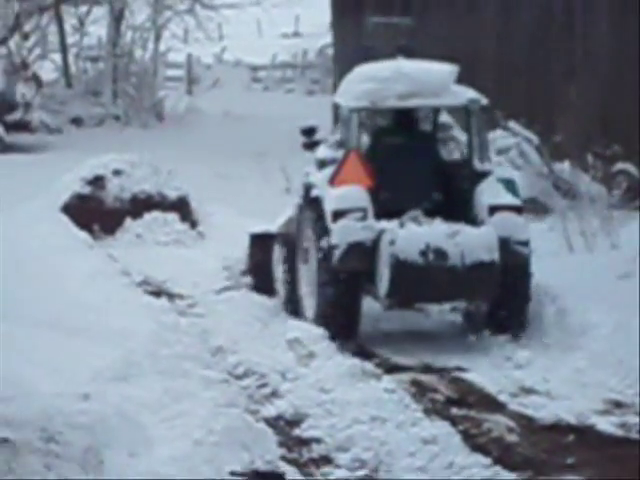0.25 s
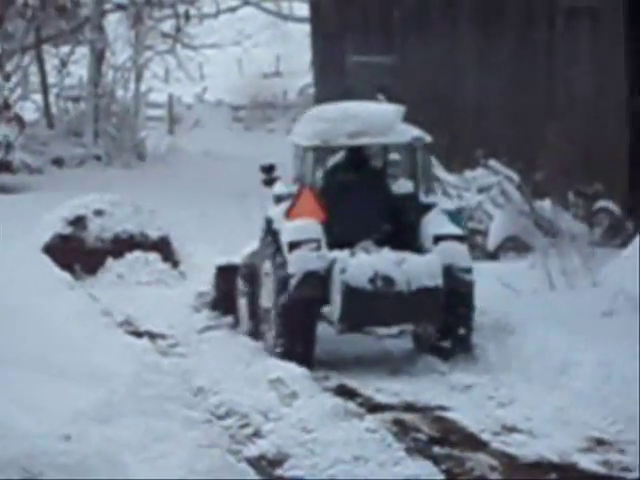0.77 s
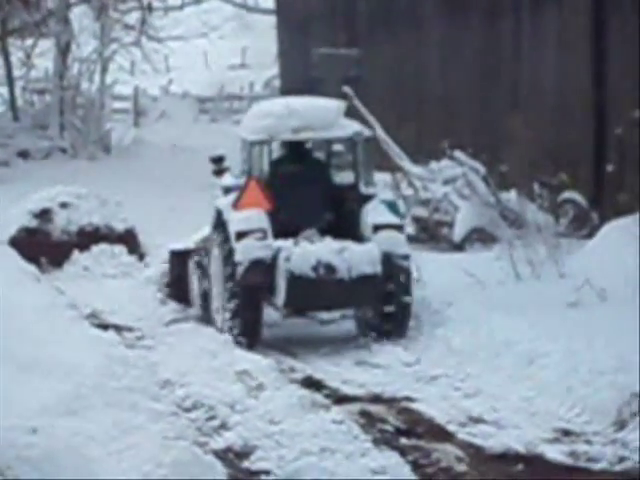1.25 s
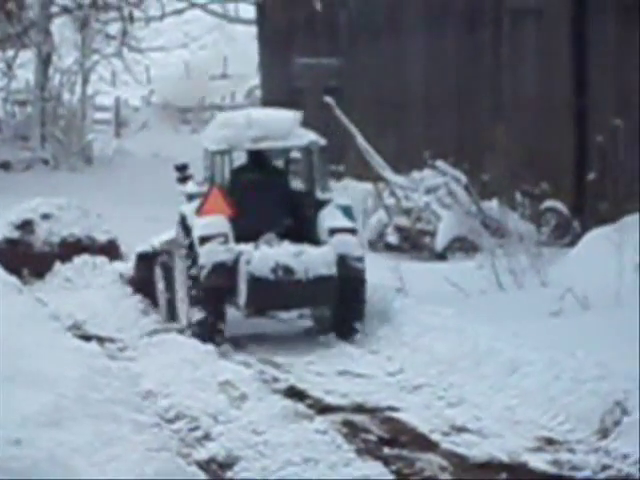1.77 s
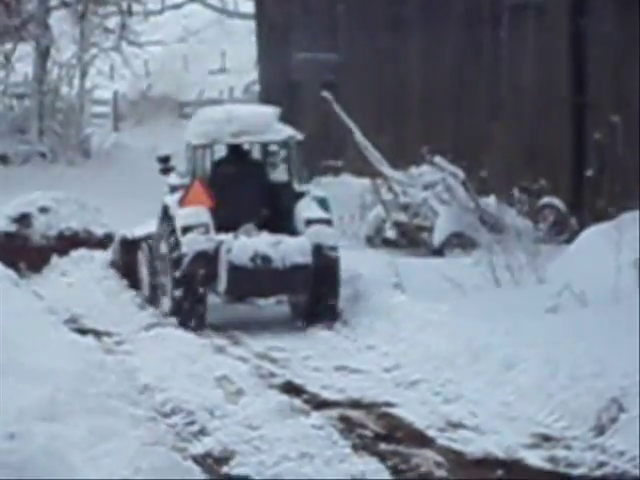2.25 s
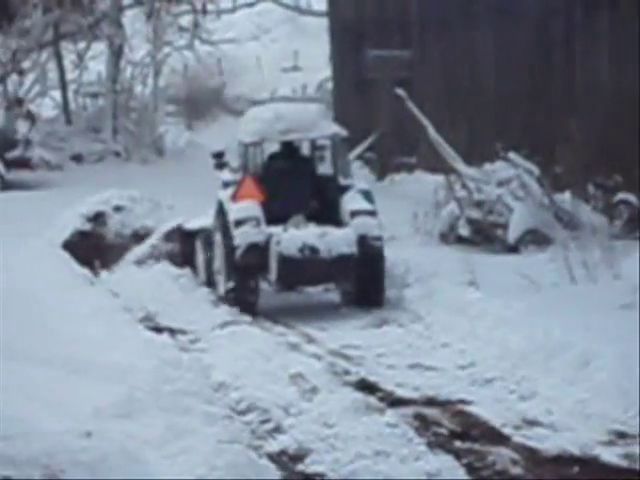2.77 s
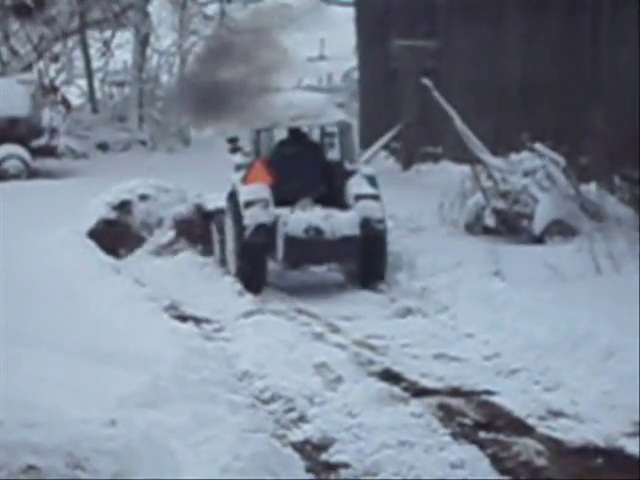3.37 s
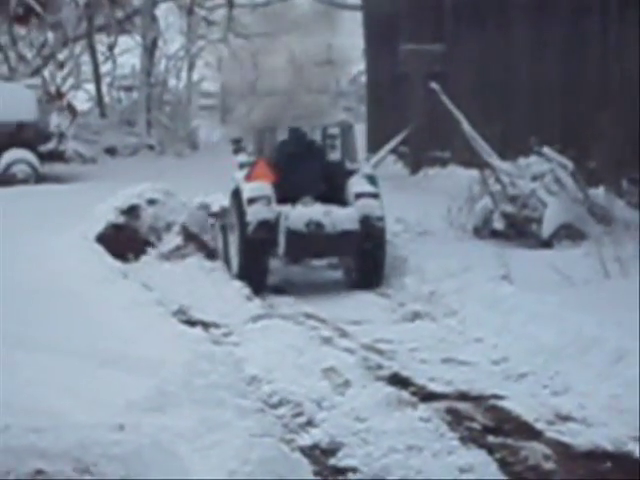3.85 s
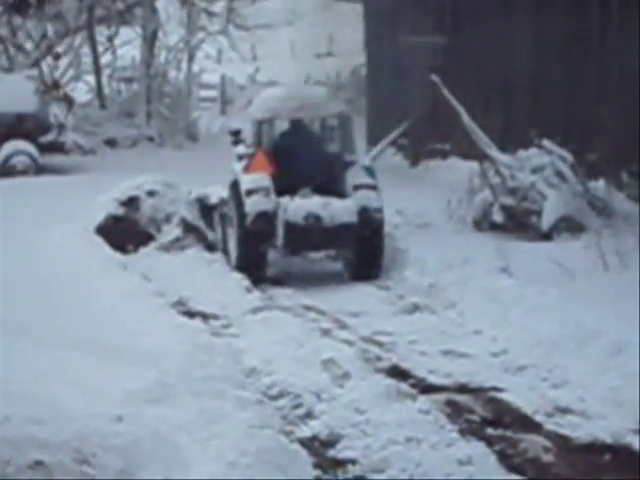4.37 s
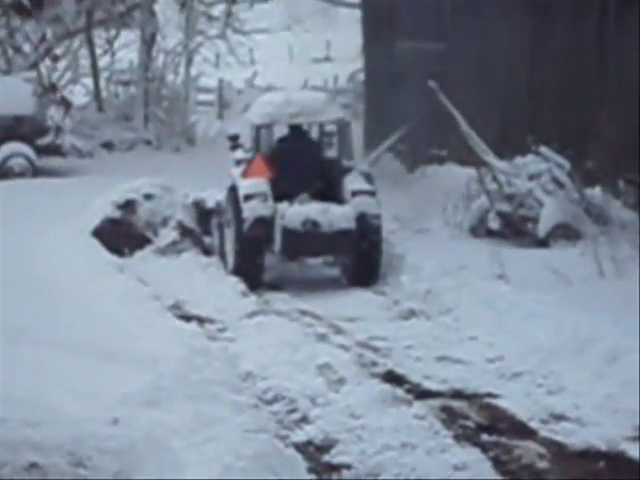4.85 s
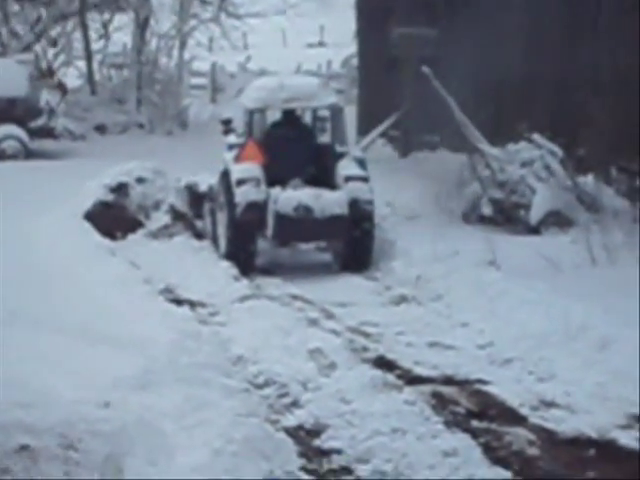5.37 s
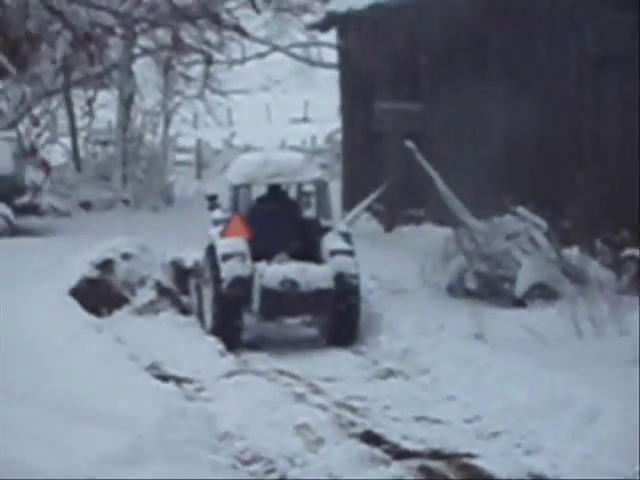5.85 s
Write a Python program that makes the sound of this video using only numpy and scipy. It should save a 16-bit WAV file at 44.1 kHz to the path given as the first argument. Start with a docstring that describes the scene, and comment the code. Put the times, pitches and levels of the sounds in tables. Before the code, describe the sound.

Steady tractor engine chug with a buzzing, hissing edge and low wind buffeting, heard from behind as it draws off. After a short stumble and a strong burst of revs, it falls to a slower, softer knocking. Hard metal knocks and rattles come from the loader, then dry close clicks, and finally a deep throaty pull. Open air, no echo, rough low-quality camera microphone.

```python
"""A four-cylinder diesel tractor drives away over a snowy farmyard, drops to idle and picks up again.
One crank phase times a booming stack, a ringing block, a rasp of gas, a buzz and the drone of the drive.
The front loader clanks as blows excite its modes, with hisses and dry clicks; filtered noise is the wind.
A pocket camera takes only 8000 samples a second and holds each one, which adds a gritty treble."""
import sys
import numpy as np
from scipy import signal
from scipy.fft import rfft, irfft
from scipy.io import wavfile
from scipy.ndimage import uniform_filter1d

SR = 44100
rng = np.random.default_rng(int(sys.argv[2]) if len(sys.argv) > 2 else 0)


def store_pcm(level_fs):
    """Save levels as 16-bit WAV."""
    pcm = np.round(np.clip(level_fs, -1, 1) * 32767).astype(np.int16)
    wavfile.write(sys.argv[1], SR, np.atleast_2d(pcm).T)


N = 269892
TIME = np.arange(N) / SR  # s
FREQ = np.arange(N // 2 + 1) * SR / N  # Hz


def undb(db):
    """Decibels to gain."""
    return 10 ** (np.asarray(db) / 20)


def unit(x):
    """Scale to rms 1."""
    return x / np.sqrt(np.mean(x ** 2))


def curves(table):
    """The columns of a timed table after its seconds, joined by straight lines."""
    s, *columns = np.transpose(table)
    return [np.interp(TIME, s, column) for column in columns]


def bell(x, centre, half):
    """A smooth Gaussian hump, 1 at its centre; half is its standard deviation."""
    return np.exp(-.5 * ((x - centre) / half) ** 2)


def burst(age, rise_s, decay_s):
    """Envelope that swells quickly and dies away."""
    age = np.maximum(age, 0)
    return (1 - np.exp(-(age / rise_s) ** 2)) * np.exp(-age / decay_s)


def noise():
    """White noise."""
    return rng.standard_normal(N)


def walk(rate_hz):
    """Random wander of rms 1: noise under a Gaussian low-pass."""
    return unit(irfft(rfft(noise()) * np.exp(-(FREQ / rate_hz) ** 2), N))


def colour(x, points):
    """Causal minimum-phase filter through (Hz, dB) points."""
    hz, db = np.transpose(points)
    gain = undb(np.interp(np.log(FREQ + 1), np.log(hz), db))
    cepstrum = irfft(np.log(gain), N)
    fold = 1 + np.sign(N / 2 - np.arange(N))
    fold[0] = 1
    return irfft(rfft(x) * np.exp(rfft(cepstrum * fold)), N)


def resonate(x, hz, width_hz):
    """One resonance, gain 1 at its centre."""
    b, a = signal.iirpeak(hz, hz / width_hz, fs=SR)
    return signal.lfilter(b, a, x)


def lowpass(x, hz):
    """Steep roll-off above hz."""
    return signal.sosfilt(signal.butter(8, hz, fs=SR, output="sos"), x)


def bright_hiss():
    """A narrow, bright band of hiss: noise through two equal resonances and a low-pass."""
    band = resonate(resonate(noise(), 3720, 2400), 3720, 2400)
    return unit(lowpass(band, 4430))


def scatter(firing, spread_db):
    """A random strength for each firing."""
    strengths = undb(spread_db * rng.standard_normal(N // 100))
    return strengths[firing]


def orders(phase, table, waver_db):
    """Tones locked to the crankshaft at multiples of the firing rate, each wavering by waver_db rms."""
    total = 0
    for multiple, db in table:
        gain = undb(db + waver_db * walk(12.4))
        total = total + gain * np.sqrt(2) * np.sin(2 * np.pi * (multiple * phase + rng.random()))
    return total


def air():
    """Wind buffets the microphone: low-frequency noise under uneven gusts."""
    # Wind spectrum. Each row: frequency in Hz, relative level in dB.
    wind_points = [(5, -10.5), (14, 11), (28, -12), (60, -6.5), (100, -11), (180, -28), (400, -33),
                   (1500, -84)]
    # Gusts. Each row: time in seconds, mean level in dB.
    gust_rows = [(0, -24), (.4, -21), (.8, -24), (2.4, -24), (3.1, -54), (3.75, -30), (4.25, -19.5),
                 (4.8, -24), (5.4, -24), (6.12, -25)]
    gust_db = curves(gust_rows)[0] + 2.7 * walk(8.3)
    return unit(colour(noise(), wind_points)) * undb(gust_db)


def clicks():
    """Short dry snaps close by: a push with a crackle on it, through a broad resonance."""
    # Sharp clicks. Each row: start in seconds, relative level in dB, centre in Hz, decay in seconds.
    click_rows = [(5.171, -24, 3724, 0.00085), (5.4217, -13.5, 3200, 0.0015), (5.8221, -10.5, 1140, 0.0023)]
    snaps = 0
    for s, db, hz, decay_s in click_rows:
        push = (1.08 + 0.65 * noise()) * burst(TIME - s, rise_s=.0001, decay_s=decay_s)
        snaps = snaps + undb(db) * resonate(push, hz, width_hz=hz)
    return undb(7) * lowpass(snaps, 5900)


def loader():
    """Each blow strikes the loader frame once, then slack pins rattle it; bright hisses swell in between."""
    # Modes of the loader. Each row: frequency in Hz, relative level in dB, t60 in seconds.
    modes = [(636, -1, 0.083), (728, -0.5, 0.057), (798, 2, 0.023), (964, -2.5, 0.045), (1038, 0.5, 0.043),
             (1260, -8, 0.022), (2510, -12, 0.017), (3120, -10, .02)]
    # Blows. Each row: start in seconds, relative level in dB, rattle decay in seconds,
    # steel hiss in dB against the rattle, before the hiss filter and its gain.
    blows = [(4.21, -27, 0.012, -7), (4.419, -22, 0.015, -6), (4.4355, -11.5, 0.02, -10),
             (4.509, -27, 0.036, -2.5), (4.581, -31, 0.015, -2), (4.595, -21.5, 0.021, -5),
             (4.692, -26.5, 0.0088, -5), (5.234, -30.5, 0.0081, 1)]
    # Short bright hisses. Each row: centre in seconds, peak level in dB, half length in seconds.
    hisses = [(4.526, -30, 0.011), (4.913, -44, 0.022), (5.218, -36, 0.0096), (5.489, -35.5, 0.015)]

    contact, chafe = 0, 0
    for s, db, rattle_s, hiss_db in blows:
        age = TIME - s
        rattle = undb(db) * burst(age, rise_s=0.0016, decay_s=rattle_s) * noise()
        strike = undb(db + 6.5) * burst(age, rise_s=.00005, decay_s=0.00031)
        contact = contact + 0.45 * rattle + strike
        chafe = chafe + undb(hiss_db) * rattle
    contact = signal.sosfilt(signal.butter(3, 450, "high", fs=SR, output="sos"), contact)

    ring = 0
    for k, (hz, db, t60_s) in enumerate(modes):
        width_hz = np.log(1000) / (np.pi * t60_s)
        sign = (-1) ** k  # neighbouring modes swing in opposite directions
        gain = undb(db - 3) * np.sqrt(SR / (np.pi * width_hz))  # offsets the loss in narrow modes
        ring = ring + sign * gain * resonate(contact, hz, width_hz)

    steel_hiss = undb(6.0) * lowpass(resonate(chafe, 3360, 4600), 4300)
    swells = sum(undb(db) * bell(TIME, s, half_s) for s, db, half_s in hisses)
    return ring + steel_hiss + swells * bright_hiss()


def whistle(age):
    """A thin, unsteady, airy tone as the engine picks up; it chatters with the firings."""
    # Whistle. Each row: time in seconds, pitch in Hz, level in dB.
    whistle_rows = [(5.62, 2020, -82), (5.7, 2130, -34), (5.8, 2216, -45), (5.89, 2250, -38),
                    (5.97, 2325, -33), (6.02, 2450, -37), (6.12, 2600, -40)]
    hz, db = curves(whistle_rows)
    chatter = unit(0.2 + burst(age, rise_s=0.0052, decay_s=0.015))
    tone = np.sqrt(2) * np.sin(2 * np.pi * np.cumsum(hz) / SR)
    return undb(db) * chatter * walk(210) * tone


def drive(phase):
    """Crank-locked drone of the drive, dying away when the clutch goes in."""
    # Drone tones. Each row: multiple of the firing rate, relative level in dB.
    drone_tones = [(4.25, 0.5), (4.751, -7), (5.498, -4), (5.75, -5.5)]
    # Drone strength in gear. Each row: time in seconds, level in dB.
    gear_rows = [(0, -32.5), (.55, -34), (.9, -46), (1.25, -32.5), (1.6, -40), (1.95, -33), (2.36, -36)]
    clutch_s, fade_s = 2.36, 0.062
    engaged = np.exp(-np.maximum(TIME - clutch_s, 0) / fade_s)
    return engaged * undb(curves(gear_rows)[0]) * orders(phase, drone_tones, waver_db=0.0)


def buzz(firing, age, load):
    """A bright buzz rides on the firings, flaring up and fading over a few of them."""
    # Flares. Each row: centre in seconds, rise in dB.
    flares = [(.5, 0), (1.1, 5), (1.711, 4), (1.88, 8.5), (2.87, 10)]
    flare_half_s = 0.037
    flare_db = sum(db * bell(TIME, s, flare_half_s) for s, db in flares)
    strength = scatter(firing, spread_db=2.5) * undb(flare_db + walk(8))
    envelope = unit(load * strength * burst(age, rise_s=0.0037, decay_s=0.0024))
    return envelope * bright_hiss()


def rasp(firing, age, load):
    """Gas hisses out once a firing under load and blows more evenly off load."""
    # Colour of the gas. Each row: frequency in Hz, relative level in dB.
    gas_points = [(500, -31), (1500, 0.5), (2050, -2.5), (2350, -0.5), (2600, 5), (2900, 0.5), (3300, -4),
                  (3900, -4), (4400, -12.5), (6000, -76)]
    puff = unit(burst(age, rise_s=0.0029, decay_s=0.0061)) * scatter(firing, spread_db=2.8)
    jet = noise() * (load * puff + 1.33 * (1.2 - load))
    levelled = jet / np.sqrt(uniform_filter1d(jet ** 2, size=SR // 4))
    return unit(colour(levelled, gas_points))


def cylinder_ring(firing, age):
    """Each of the four cylinders has its own clatter, which shifts slowly as the tractor moves."""
    cylinders = 4
    cylinder, sample = firing % cylinders, (age * SR).astype(int)
    # frozen noise per cylinder, replayed every cycle; slow weights blend three sets
    patterns = [noise().reshape(cylinders, -1)[cylinder, sample] for _ in range(3)]
    weights = np.array([walk(1.25) for _ in patterns])
    return np.sum(weights * patterns, axis=0) / np.linalg.norm(weights, axis=0)


def knock(firing, age, load):
    """Combustion shakes the block; most of the clatter comes back with every four-stroke cycle."""
    # Colour of the block. Each row: frequency in Hz, relative level in dB.
    block_points = [(80, -1), (140, 2.5), (195, -5), (310, -1), (440, -4), (520, -1.5), (640, 4), (800, -1),
                    (980, -4), (1200, -6.5), (1400, -26), (2200, -22.5), (5000, -65)]
    blow = unit(burst(age, rise_s=0.0028, decay_s=0.019)) * scatter(firing, spread_db=1.5)
    clatter = 1.7 * cylinder_ring(firing, age) + noise()
    push = clatter * (load * blow + 1.35 * (1.05 - load))
    push = push / np.sqrt(uniform_filter1d(push ** 2, size=SR // 6))
    block = colour(push, block_points)
    # harder combustion brings out the block's upper resonance
    return block + undb(7.5) * load * resonate(block, 942, 153)


def exhaust(phase, hz, load):
    """The muffler rounds firings to a deep sawtooth with sliding overtones; unequal cylinders lope."""
    # Boom at the firing rate. Each row: time in seconds, mean level in dB.
    boom_rows = [(0, -21), (.8, -24.5), (1.22, -14), (1.6, -16), (2.41, -10.5), (2.51, -25), (2.57, -6.5),
                 (2.7, -12), (3.28, -16.5), (3.77, -31), (4.2, -21), (4.6, -32.5), (4.9, -17),
                 (5.54, -27.5), (5.67, -13), (5.82, -18), (5.96, -6), (6.12, -21)]
    # Muffler response to the overtones at full load. Each row: frequency in Hz, level in dB.
    muffler_points = [(45, -16), (54, -10), (64, -24), (78, -14), (92, -15.5), (106, -24), (117, -21.5),
                      (145, -38), (180, -30.5)]
    # Levels in dB added to the muffler response at twice and three times the firing rate.
    overtone_db = [-0.5, -9]
    # Lope of unequal cylinders. Each row: multiple of the firing rate,
    # level in dB against the boom before load evens it out.
    lope_tones = [(.5, -17), (0.751, -11.5), (1.75, -19), (2.249, -30.5)]
    overtone_load_db = 15.5  # rise from no load to full load

    boom_db, = curves(boom_rows)
    muffler_hz, muffler_db = np.transpose(muffler_points)
    levels_db = [boom_db]
    for multiple, db in enumerate(overtone_db, 2):
        passed_db = np.interp(multiple * hz, muffler_hz, muffler_db)
        levels_db.append(db + passed_db + overtone_load_db * (load - 1))

    boom = 0
    for multiple, db in enumerate(levels_db, 1):
        gain = np.sqrt(2) * undb(db + .5 * walk(5.5))
        boom = boom - gain * np.sin(2 * np.pi * multiple * phase)
    evenness = load ** 4  # high load evens the cylinders out
    lope = (1 - 1.2 * evenness) * undb(boom_db) * orders(phase, lope_tones, waver_db=4.0)
    return boom + lope


def engine():
    """One crank; load and speed set knock and rasp; boom, whistle, drone follow their own level curves."""
    # Engine speed. Each row: time in seconds, firing rate in Hz.
    speed_rows = [(0.0, 59.25), (0.5, 57.63), (0.8, 59.63), (1.1, 58.23), (1.4, 58.76), (2.37, 57.4),
                  (2.55, 53.84), (2.85, 57.94), (3.29, 59.48), (3.47, 52.06), (4.4, 38.41), (5.2, 28.76),
                  (5.57, 24.58), (5.72, 28.4), (5.9, 30.0), (6.12, 39.5)]
    # Fuel rack: drives knock, rasp, buzz, lope and boom overtones. Each row: time in seconds, load 0-1.
    load_rows = [(0, 0.57), (.45, 0.72), (.82, 0.61), (1.15, 0.82), (1.9, 0.83), (2.37, .8), (2.43, 0.52),
                 (2.51, 0.24), (2.555, 1), (2.69, 0.74), (3.28, 0.85), (3.37, 0.18), (3.8, 0.36),
                 (4.75, 0.39), (5.57, 0.09), (5.64, 0.71), (5.81, 0.5), (5.94, 0.95), (6.12, 0.79)]
    # Upper hum of the stack. Each row: multiple of the firing rate, mean level in dB against the knock.
    hum_tones = [(3.752, -28), (4, -22.5), (4.998, -21), (6, -19.5)]
    cruise_hz = 58
    knock_full_db, rasp_full_db = -20.5, -27  # at time 0, full load; rasp at cruise, knock without shake
    knock_load_db, rasp_load_db = 13.5, 19  # rise from no load to full load
    knock_fade_db_per_s, rasp_fade_db_per_s = 0.7, 1.06  # the tractor draws away
    rasp_db_per_octave = -2.5  # slow strokes let out longer gulps of gas
    rasp_load_power = 1.335  # the rasp comes in late as the load rises
    shake_hz, shake_width_hz, shake_db = 42.2, 7.4, 2.5  # body resonance on the firing rate
    panel_hz, panel_width_hz, panel_db = 211, 95, -3.5  # shaking cab panels drum hollowly
    buzz_db = -5  # against the rasp

    hz, = curves(speed_rows)
    load, = curves(load_rows)
    phase = np.cumsum(hz) / SR + .012 * walk(15)  # in firings; the crank runs slightly unevenly
    phase = np.maximum(phase, 0)
    firing = phase.astype(int)
    age = phase % 1 / hz  # s since the last firing

    shake = bell(hz, shake_hz, shake_width_hz)
    knock_db = knock_full_db + knock_load_db * (load - 1) + shake_db * shake
    knock_db = knock_db - knock_fade_db_per_s * TIME
    rasp_db = rasp_full_db + rasp_load_db * (load ** rasp_load_power - 1)
    rasp_db = rasp_db + rasp_db_per_octave * np.log2(hz / cruise_hz) - rasp_fade_db_per_s * TIME

    body = unit(knock(firing, age, load)) + orders(phase, hum_tones, waver_db=4)
    body = body + shake * undb(panel_db) * resonate(body, panel_hz, panel_width_hz)
    treble = rasp(firing, age, load) + undb(buzz_db) * buzz(firing, age, load)
    mechanical = undb(knock_db) * body + drive(phase)
    gas = exhaust(phase, hz, load) + undb(rasp_db) * treble
    return mechanical + gas + whistle(age)


def scene():
    """Open air over snow: no echo."""
    return (air() + clicks() + loader() + engine())[None]


def record(dry):
    """The camera holds samples, mirroring sound around multiples of its rate; it clips at full scale."""
    camera_hz, top_hz = 8000, 15750
    held_s = np.floor(TIME * camera_hz + .5) / camera_hz
    held = np.interp(held_s, TIME, dry[0])
    roll_off = signal.ellip(10, .2, 80, top_hz, fs=SR, output="sos")
    return signal.sosfilt(roll_off, np.clip(held, -1, 1))[None]


dry = scene()
out = record(dry)
store_pcm(out)
```